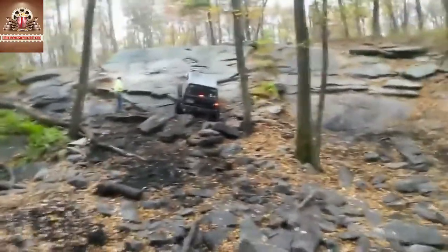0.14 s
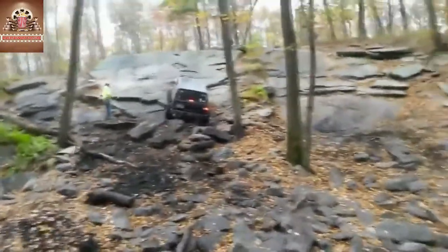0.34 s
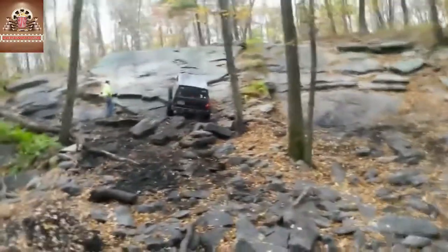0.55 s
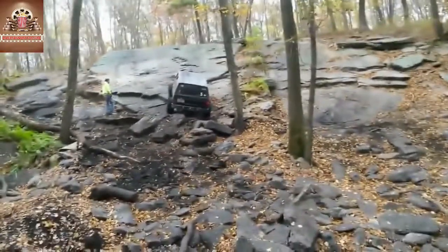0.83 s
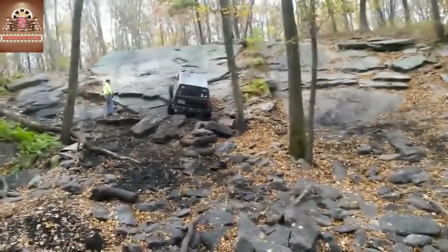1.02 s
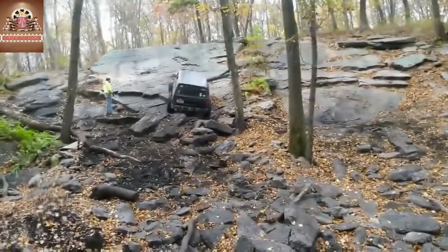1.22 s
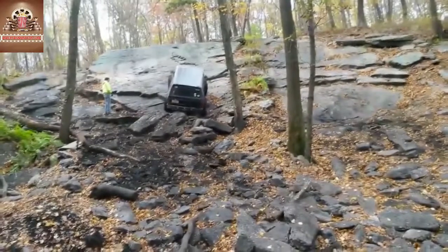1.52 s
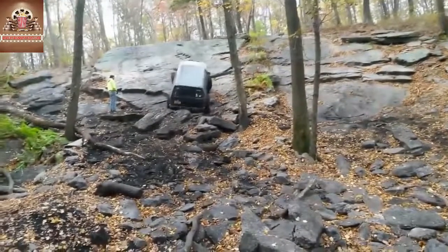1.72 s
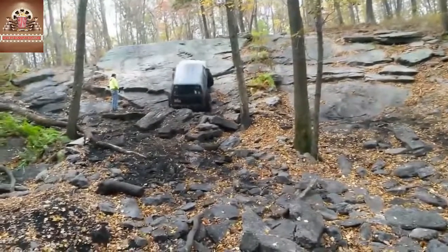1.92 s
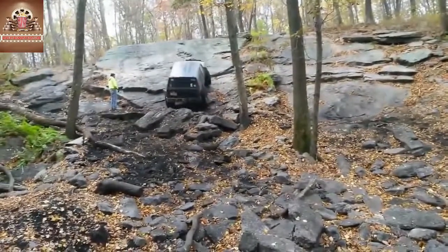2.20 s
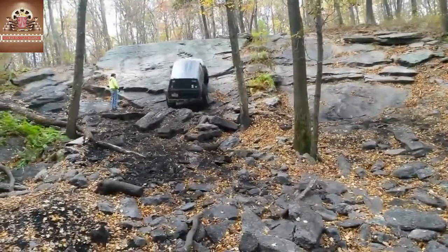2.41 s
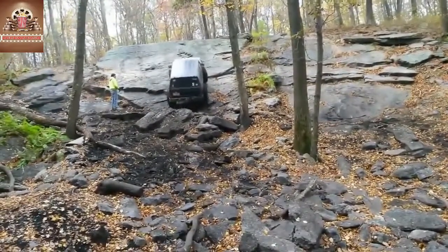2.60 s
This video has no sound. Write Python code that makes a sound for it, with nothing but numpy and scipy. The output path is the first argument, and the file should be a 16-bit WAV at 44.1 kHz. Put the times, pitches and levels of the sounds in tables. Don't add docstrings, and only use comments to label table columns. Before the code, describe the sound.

An off-road engine idles low and quiet over woodland air and hiss until about 0.8 s. It then revs hard, with rasping cracks and a loose shield rattling until 1.3 s. A sharp stone snap at 1.43 s briefly ducks the sound. Pitch keeps climbing, slipping slightly near 2 s, with rushing roar, grit fizz at 2.1 s and final cracks around 2.7 s. Distant phone pickup, no clear echo.

```python
import sys
import numpy as np
from scipy import signal
from scipy.fft import rfft, irfft, next_fast_len
from scipy.io import wavfile
from scipy.ndimage import uniform_filter1d

SR = 44100
rng = np.random.default_rng(int(sys.argv[2]) if len(sys.argv) > 2 else 0)


def rack_gain(trim_db):
    fader = np.asarray(trim_db, float)
    return 10 ** (fader / 20)


def master(y):
    cut = np.clip(np.atleast_2d(y).T, -1, 1)
    pcm = np.round(cut * 32767)
    wavfile.write(sys.argv[1], SR, pcm.astype(np.int16))


N = 121275
PAD = next_fast_len(N + 8192)


def evened(x):
    return x / np.sqrt(np.mean(x ** 2) + 1e-20)


def read(points, hz):
    f, value = np.transpose(points)
    return np.interp(np.log(hz + 1), np.log(f + 1), value)


def control(axis):
    # t/s, firing rate/Hz, note level/dB, roar effort/dB, fall per octave/dB, unevenness/dB
    engine = [(0.0, 37.35, -42, -50, -0.5, 11.5), (0.149, 35.1, -45.5, -48, 2, 11),
              (0.749, 35.77, -48.5, -49.5, 2, 16.5), (0.83, 39, -38, -48.5, -2, -1),
              (0.875, 43.83, -32, -39, -2, -11), (0.93, 49.54, -24.5, -31.5, -3.5, -18),
              (1.029, 62.27, -12, -30.5, -15, -17.5), (1.13, 79.44, -17.5, -25.5, -9.5, -13),
              (1.192, 89.2, -10.5, -27, -20.5, -13), (1.341, 110.2, -8, -24.5, -12, -27),
              (1.41, 116.4, -6, -28.5, -16.5, -20.5), (1.659, 136, -14, -31, -11, -25),
              (1.881, 175.1, -15.5, -29, -16.5, -14.5), (2.07, 168.7, -16, -25, -11, -14.5),
              (2.2, 186.6, -15.5, -27, -8.5, -17), (2.48, 207.2, -12, -23.5, -20.5, -21),
              (2.58, 215.8, -11.5, -22.5, -10, -19), (2.75, 227, -22.5, -20.5, -1.5, -6)]
    rows = np.array(engine)
    return uniform_filter1d(np.interp(np.arange(N) / SR, rows[:, 0], rows[:, axis]), size=441)


def wander(hz):
    lowpass = signal.butter(2, hz, fs=SR, output="sos")
    x = signal.sosfilt(lowpass, rng.standard_normal(N + SR // 2))
    return evened(x[-N:])


def coloured(x, points):
    gain = rack_gain(read(points, np.fft.rfftfreq(PAD, 1 / SR)))
    return irfft(rfft(x, PAD) * gain, PAD)[..., :N]


def ringing(x, peaks):
    f = np.fft.rfftfreq(N, 1 / SR)
    lift = sum(rack_gain(db) / (1 + (2 * (f - hz) / width_hz) ** 2) for hz, width_hz, db in peaks)
    return irfft(rfft(x) * (1 + lift), N)


def ports(a, b):
    # f/Hz, left minus right/dB
    port_db = [(60, -3), (380, -5), (1290, 1.5), (2400, 0), (5500, 9), (7900, -3.5), (8600, -15.5),
               (14900, -13.5)]
    # f/Hz, left-right coherence [0-1]
    likeness = [(60, 0.85), (130, 0.89), (290, 0.89), (640, 0.97), (1400, 0.18), (3090, 0.62), (6790, 0.16),
                (14900, 0.057)]
    # f/Hz, left lead/rad
    lead_rad = [(300, 0), (950, 0.26), (1550, -4.5), (2000, -6.5), (4300, -8), (5200, -6.5), (8200, 0.5)]
    hz = np.fft.rfftfreq(PAD, 1 / SR)
    same = np.clip(read(likeness, hz), 0, 1)
    tilt = rack_gain(read(port_db, hz))
    left = rfft(a, PAD) * tilt
    right = same * rfft(a, PAD) * np.exp(-1j * read(lead_rad, hz)) + np.sqrt(1 - same ** 2) * rfft(b, PAD)
    return irfft(np.array([left, right]) * np.sqrt(2 / (1 + tilt ** 2)), PAD)[:, :N]


def patchy(points, patch_db, flicker_db):
    frames, hz = N // 128 + 5, np.fft.rfftfreq(512, 1 / SR)
    z = rng.standard_normal((frames, 257, 5)).T
    patches = uniform_filter1d(z[4], size=6, axis=0)
    patches = evened(uniform_filter1d(patches, size=24, axis=1))
    flicker = evened(uniform_filter1d(rng.standard_normal(frames), size=5))
    field = rack_gain(read(points, hz)[:, None] + patch_db * patches + flicker_db * flicker)
    return signal.istft((z[:2] + 1j * z[2:4]) * field, nperseg=512, noverlap=384)[1][:, :N]


def firing_puffs(turns):
    # f/Hz, level/dB per Hz
    puff_colour = [(30, -30), (60, -25), (120, 4), (220, -6.5), (350, -12), (550, -23.5), (850, -24),
                   (1300, -39.5)]
    # f/Hz, width/Hz, level/dB
    silencer = [(112, 22, 5.5), (213, 27, 14), (315, 180, 6.5), (465, 30, 8), (510, 45, 18), (785, 71, 19)]
    noise_share, decay_turns = 0.7, 0.28
    level_db, effort_follow = -33, 0.16
    effort = control(axis=3)
    sizes = rack_gain(rng.standard_normal(1000).clip(-2, 1.5))
    size = sizes[turns.astype(int)]
    kicks = evened(np.diff(np.floor(turns), prepend=0) * (size - np.mean(size) * 0.78))
    envelope = size * np.exp(-(turns % 1) / decay_turns)
    gain = rack_gain(level_db + effort_follow * (effort - effort[0]))
    twins = []
    for _ in range(2):
        puff = noise_share * evened(envelope * rng.standard_normal(N)) + (1 - noise_share) * kicks
        twins.append(evened(ringing(coloured(puff, puff_colour), silencer)) * gain)
    return twins


def exhaust(turns):
    # f/Hz, level/dB
    pipe = [(30, -39), (70, 8.5), (125, 16), (180, 7.5), (240, -3), (350, -1), (600, -14), (1000, -13.5)]
    # overtone number, level/dB
    idle_lift = [(2, 0.5), (3, 1.5), (4, 0.5), (5, -7.5), (6, 3.5), (7, -1.5), (8, 1.5), (9, 2), (10, -3.5),
                 (11, -7), (12, -6.5), (13, 0.5), (14, -0.5)]
    # order/sixths of firing rate, level/dB
    uneven_lines = [(2, -2), (3, -13.5), (4, -3), (5, -12.5), (7, -14), (8, -9.5), (9, -19.5), (10, -4),
                    (11, -42), (13, -6), (15, -11), (21, -8), (27, -12)]
    # order/sixths of firing rate, level/dB
    growl_lines = [(10, -15.5), (11, -26), (13, -23), (15, -28), (16, -18), (18, -12), (22, -16), (23, -28),
                   (25, -25), (26, -17), (27, -18.5), (29, -20.5), (30, -21), (32, -16)]
    # t/s, level/dB, half length/s
    stumbles = [
        (1.376, -7, 0.006),
        (1.7, -3, 0.021),
        (1.8, -5.5, 0.016),
        (2.638, -4, 0.016),
        (2.74, -4, 0.026),
    ]
    pipe_hz, pipe_width_hz = 119, 85
    waver_db, pipe_share = 1.0, 0.44
    growl_db, growl_db_per_octave = -13.5, 44.5

    hz, level, _, fall, uneven = (control(axis=k) for k in range(1, 6))
    t = np.arange(N) / SR
    idle = (hz[0] / hz) ** 2
    lag = 2 * np.arctan((hz - pipe_hz) / pipe_width_hz)
    note = np.cos(2 * np.pi * turns - lag) * rack_gain(waver_db * wander(13))
    note = note * rack_gain(sum(db * np.exp(-((t - s) / half_s) ** 2) for s, db, half_s in stumbles))
    for k, lift_db in idle_lift:
        k = round(k)
        lag = 2 * np.arctan((k * hz - pipe_hz) / pipe_width_hz) + 0.75 * idle * wander(6.8)
        db = read(pipe, k * hz) + fall * np.log2(k) + lift_db * idle + 2 * waver_db * wander(13)
        note = note + rack_gain(db) * np.cos(2 * np.pi * k * turns - lag)

    def line(k, db, line_waver_db=3, line_waver_hz=7):
        phase = 2 * np.pi * (round(k) / 6 * turns + rng.random())
        return rack_gain(db + line_waver_db * wander(line_waver_hz).clip(-4, 1.5)) * np.cos(phase)

    note = note + sum(line(k, db + uneven + pipe_share * read(pipe, k / 6 * hz)) for k, db in uneven_lines)
    growl = sum(line(k, db, 4.5, 19) for k, db in growl_lines)
    growl = growl * rack_gain(growl_db + growl_db_per_octave * np.log2(hz / hz[-1]))
    low_cut = signal.butter(3, 42, "highpass", fs=SR, output="sos")
    tones = signal.sosfilt(low_cut, np.sqrt(2) * rack_gain(level) * note + growl + firing_puffs(turns))
    return ports(tones[0], tones[1] - tones[0])


def cracks():
    # t/s, level/dB
    crack_events = [(.856, -34), (0.88, -25.5), (0.904, -21.5), (0.924, -24), (0.946, -20), (0.965, -19.5),
                    (0.984, -28), (1.004, -26), (1.032, -25.5), (1.047, -26), (1.063, -28), (1.117, -31),
                    (1.186, -24.5), (2.722, -18), (2.738, -16)]
    # f/Hz, level/dB per Hz
    crack_colour = [(300, -1), (600, 3), (850, 9), (1150, -2), (1400, -8.5), (2250, -4), (3000, -20),
                    (9000, -33)]
    t60_s = 0.045
    t = np.arange(N) / SR
    shape = sum((t > s) * rack_gain(db - 60 * np.maximum(t - s, 0) / t60_s) for s, db in crack_events)
    return ports(*(evened(coloured(rng.standard_normal((2, N)), crack_colour)) * shape))


def rattles():
    # t/s, level/dB, f/Hz
    shield_hits = [(0.8783, -30, 1800), (0.9029, -25, 2420), (0.9437, -15.5, 2160), (1.0005, -26, 2410),
                   (1.018, -25, 1945), (1.034, -27, 2680), (1.0624, -24, 2450), (1.0774, -18, 2530),
                   (1.0898, -16, 2370), (1.1527, -28.5, 2530), (1.1995, -18.5, 1930), (1.2614, -29, 2580),
                   (1.3191, -23, 2440)]
    level_db, t60_s, width_hz, attack_s = -0.5, 0.023, 900, 0.0005
    out = np.zeros((2, N))
    slow = rng.standard_normal((2, N)) + 1j * rng.standard_normal((2, N))
    slow = signal.lfilter([1], [1, -np.exp(-np.pi * width_hz / SR)], slow)
    slow = slow / np.sqrt(np.mean(abs(slow) ** 2))
    u = np.arange(SR // 10) / SR
    for s, db, hz in shield_hits:
        at = round(s * SR)
        span = slice(at, at + len(u))
        envelope = rack_gain(level_db + db - 60 * u / t60_s) * np.minimum(u / attack_s, 1)
        ring = (0.57 + 0.35 * slow[:, span]) * np.exp(2j * np.pi * hz * u)
        out[:, span] += envelope * ring.real
    return ports(*out)


def band_even(x, lo_hz, hi_hz):
    bandpass = signal.butter(4, [lo_hz, hi_hz], "bandpass", fs=SR, output="sos")
    band = signal.sosfilt(bandpass, x)
    return x / np.sqrt(np.mean(band ** 2))


def roar(turns):
    # f/Hz, level/dB per Hz
    roar_colour = [(350, 3), (600, 0.5), (988, -2.5), (1310, -5), (1960, -3.5), (4060, -7.5), (5390, -7),
                   (12600, -27), (15000, -31)]
    # f/Hz, width/Hz, level/dB
    body = [(821, 19, 7), (2460, 660, -10.5), (5510, 790, -2), (6420, 1700, 2)]
    level_db, gate_depth, gate_decay_turns = -1.5, 0.16, 0.63
    grit_db, grit_per_s, grit_spread_db = -6.5, 760, -0.5
    bright_db, bright_db_per_octave = -12, 12

    gate = 1 - gate_depth + gate_depth * evened(np.exp(-(turns % 1) / gate_decay_turns))
    grit_size = rack_gain(grit_spread_db * np.minimum(rng.exponential(1, (2, N)), 5))
    grit = grit_size * (rng.random((2, N)) < grit_per_s / SR)
    grit = signal.lfilter([1], [1, -0.97], grit) * rng.standard_normal((2, N))
    rush = evened(patchy(roar_colour, patch_db=2.0, flicker_db=0.82)) * gate
    x = rush + rack_gain(grit_db) * evened(coloured(grit, roar_colour))
    x = band_even(ringing(x, body), 1500, 8000)
    speed = control(axis=1)
    sizzle = np.diff(x, n=2, axis=1, prepend=0, append=0)
    x = x - sizzle * rack_gain(bright_db + bright_db_per_octave * np.log2(speed / speed[-1]))
    return ports(*(x * rack_gain(level_db + control(axis=3))))


def stones(snap_s):
    # f/Hz, level/dB, t60/s
    snap_modes = [(1800, -11, 0.0013), (3640, 3, 0.0025), (5450, 9, 0.0037), (7900, -6, .0025),
                  (11400, -4, 0.0031), (13500, -13, 0.0018), (15000, -24, .0015)]
    # t/s, level/dB, t60/s
    sprays = [
        (2.055, -32.5, 0.18),
        (2.099, -30.5, 0.21),
        (2.118, -47, 0.13),
    ]
    snap_db = -14.5
    t = np.arange(N) / SR
    u = np.maximum(t - snap_s, 0)
    snap = -sum(rack_gain(snap_db + db - 60 * u / t60_s) * np.sin(2 * np.pi * hz * u) for hz, db, t60_s in snap_modes)
    bandpass = signal.butter(6, [7500, 14500], "bandpass", fs=SR, output="sos")
    fizz = signal.sosfilt(bandpass, rng.standard_normal((2, N)))
    spray = fizz * sum((t > s) * rack_gain(db - 60 * np.maximum(t - s, 0) / t60_s) for s, db, t60_s in sprays)
    return snap * rack_gain(np.array([[2.], [-3.]])) + spray * rack_gain(np.array([[-8.], [5.]]))


def air():
    # f/Hz, level/dB per Hz
    air_colour = [(300, 2), (480, 7.5), (750, -1.5), (1100, -5.5), (2200, -10), (3900, -16), (8800, -14.5),
                  (14500, -12.5)]
    # f/Hz, level/dB
    left_hiss = [(7000, -2), (8700, 6), (9400, 7.5), (10000, -1.5)]
    level_db = -39.5
    wash = evened(patchy(air_colour, patch_db=0.87, flicker_db=1.0))
    left, right = ports(*(rack_gain(level_db) * wash))
    return np.array([coloured(left, left_hiss), right])


def scene():
    snap_s = 1.4316
    duck_db, duck_before_s, duck_after_s = -9, 0.014, 0.016
    turns = 0.2004 + np.cumsum(control(axis=1)) / SR
    u = np.arange(N) / SR - snap_s
    duck = rack_gain(duck_db * np.exp(-np.where(u < 0, u / duck_before_s, u / duck_after_s) ** 2))
    return (exhaust(turns) + roar(turns) + air()) * duck + cracks() + rattles() + stones(snap_s)


def thinned(x):
    band_edges_hz = (6250, 6880, 7530, 8250)
    # start/s, end/s, lowest band index, highest band index
    dropouts = [(0, .1, 0, 0), (.08, .17, 1, 1), (.26, .49, 0, 0), (.41, .45, 1, 1), (.5, .65, 0, 1),
                (.68, .72, 1, 1), (.73, .79, 0, 0), (1.03, 1.08, 1, 1), (1.12, 1.2, 1, 1),
                (1.13, 1.17, 2, 2), (1.56, 1.63, 1, 1), (1.8, 1.93, 1, 1), (1.92, 1.97, 0, 0),
                (1.98, 2.06, 1, 1), (2.06, 2.12, 2, 2), (2.27, 2.39, 1, 2), (2.29, 2.35, 0, 0),
                (2.41, 2.45, 0, 0), (2.67, 2.74, 1, 1)]
    weak_hz, weak_db, weak_rise = 8300, -15, 0.12
    edge_hz, sag_hz_per_db, lift_hz_per_db, wobble_hz = 14500, 90, 115, 120
    spiky, spiky_from_hz = 0.4, 1000

    hz, t, z = signal.stft(x, SR, nperseg=1024, noverlap=512)
    power = abs(z) ** 2 + 1e-20

    def band_db(lo_hz, hi_hz):
        return 10 * np.log10(power[:, (hz > lo_hz) & (hz < hi_hz)].mean((0, 1)))

    loud, top = band_db(2000, 8000), band_db(9000, 14000)
    loud_rise = loud - loud.min()
    top_smooth = uniform_filter1d(top, size=15)

    bands = 10 * np.log10(power[:, :512].reshape(2, 64, 8, -1).mean(2))
    balance = uniform_filter1d(bands[0] - bands[1], size=4, axis=1)
    weak = balance < weak_db + weak_rise * loud_rise
    z[0, :512] *= ~(np.repeat(weak, 8, 0) & (hz[:512, None] > weak_hz))

    jump_db = np.maximum(top - top_smooth - 1.5, 0)
    wobble = evened(uniform_filter1d(rng.standard_normal(len(t)), size=5))
    ragged = evened(uniform_filter1d(rng.standard_normal((len(t), 86)), size=4, axis=0))
    ragged = np.repeat(ragged.T, 6, 0)[:513]
    edge = edge_hz - sag_hz_per_db * loud_rise + wobble_hz * (wobble + 2 * ragged)
    edge = edge + lift_hz_per_db * (top_smooth - top.min()) + 300 * jump_db
    z *= hz[:, None] < edge

    for start_s, end_s, lo, hi in dropouts:
        inside = (hz > band_edges_hz[lo]) & (hz < band_edges_hz[hi + 1])
        z[:, inside] *= (t < start_s) | (t > end_s)
    peaks = (power / uniform_filter1d(power, size=15, axis=1)) ** (spiky / 2)
    z *= np.where(hz[:, None] > spiky_from_hz, peaks, 1)
    return signal.istft(z, SR, nperseg=1024, noverlap=512)[1][:, :N]


def low_pass(x):
    return signal.sosfilt(signal.butter(12, 15530, fs=SR, output="sos"), x)


def record(dry):
    limited = np.tanh(dry / 1.471) * 1.557
    low_cut = signal.butter(2, 37, "highpass", fs=SR, output="sos")
    mix = thinned(signal.sosfilt(low_cut, limited))
    return low_pass(mix)


dry = scene()
out = record(dry)
master(out)
```